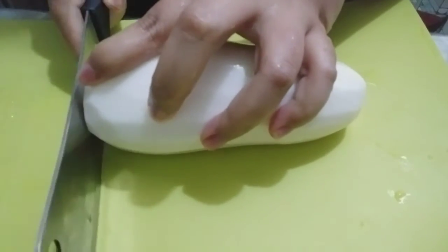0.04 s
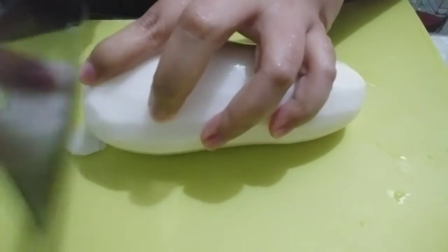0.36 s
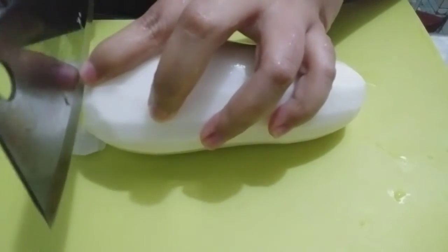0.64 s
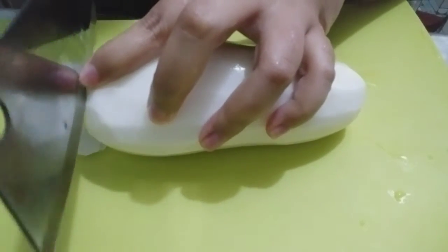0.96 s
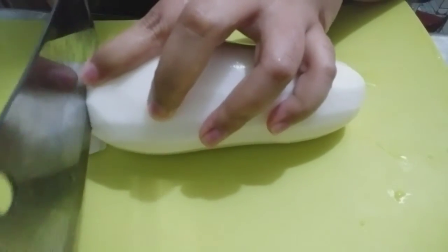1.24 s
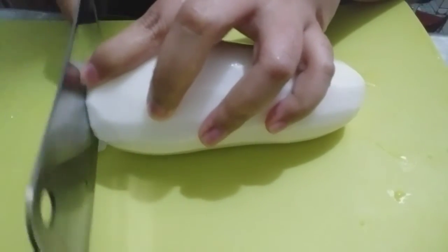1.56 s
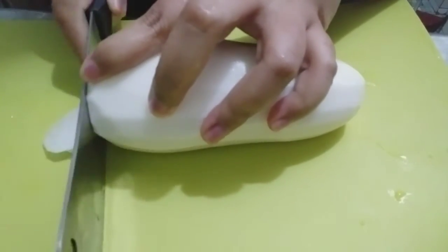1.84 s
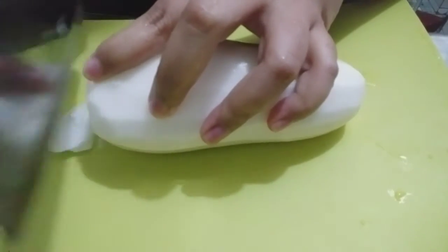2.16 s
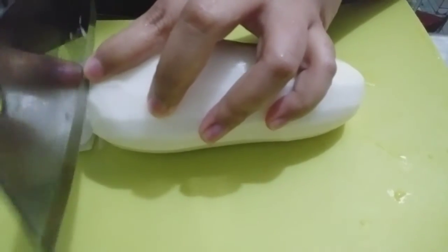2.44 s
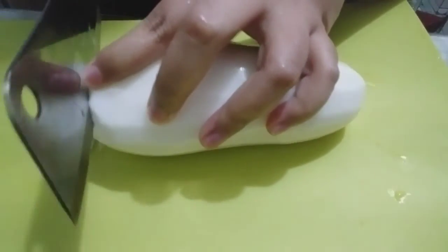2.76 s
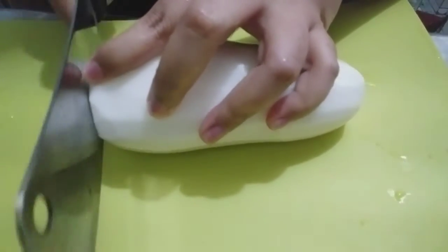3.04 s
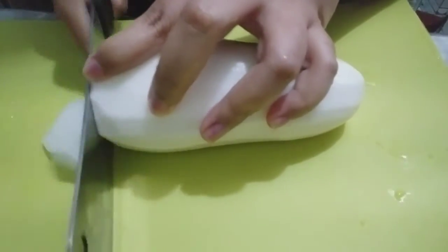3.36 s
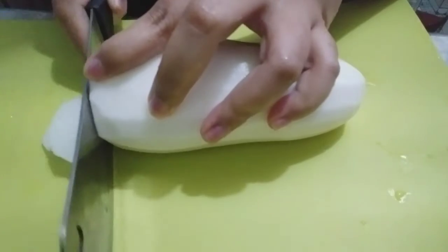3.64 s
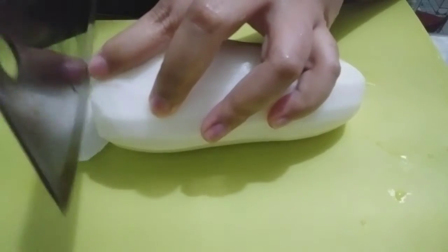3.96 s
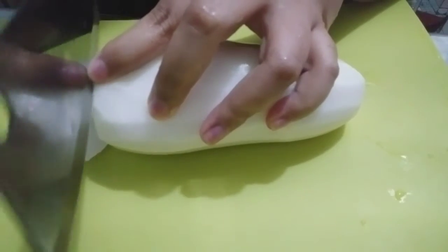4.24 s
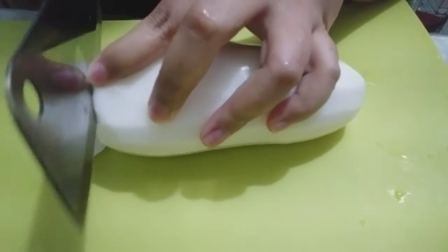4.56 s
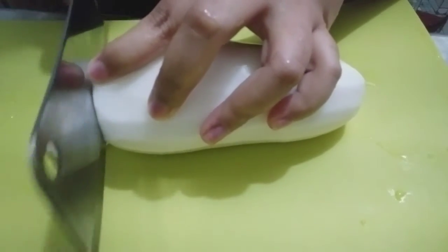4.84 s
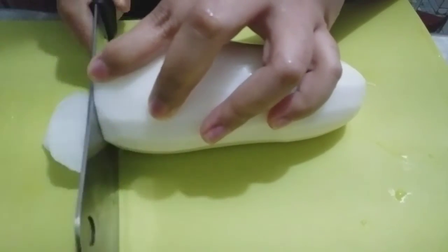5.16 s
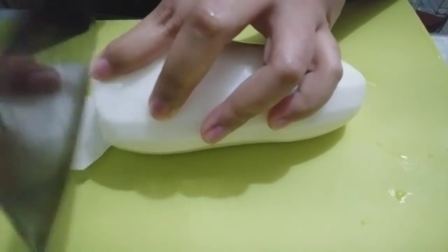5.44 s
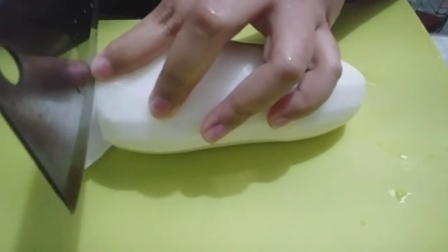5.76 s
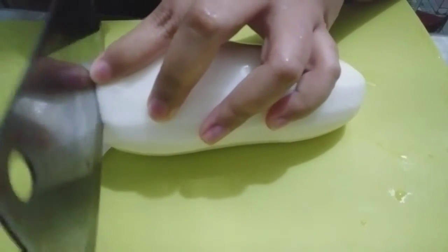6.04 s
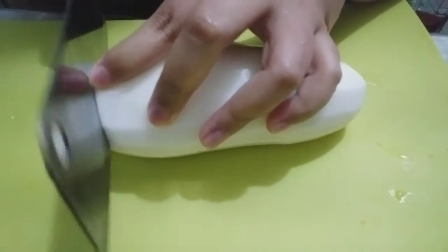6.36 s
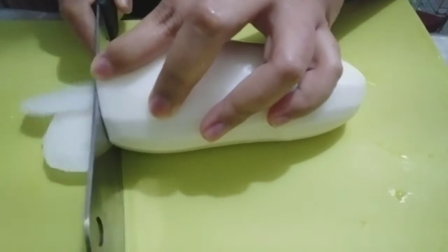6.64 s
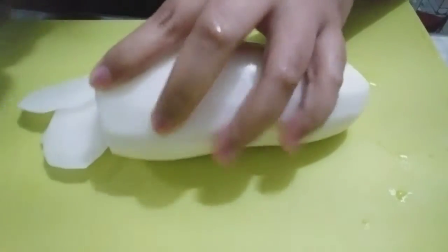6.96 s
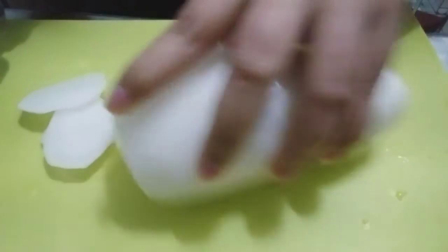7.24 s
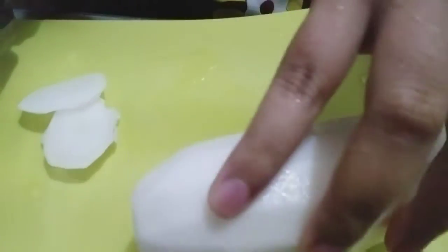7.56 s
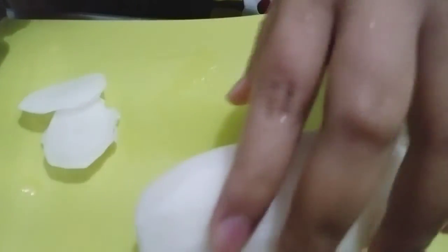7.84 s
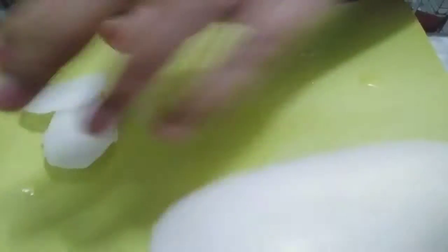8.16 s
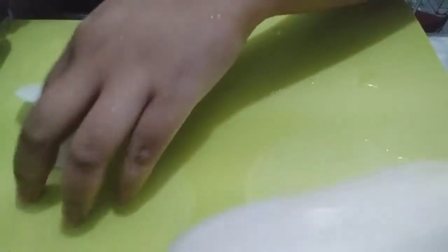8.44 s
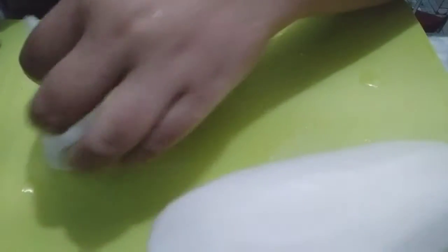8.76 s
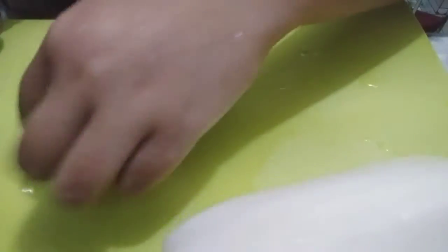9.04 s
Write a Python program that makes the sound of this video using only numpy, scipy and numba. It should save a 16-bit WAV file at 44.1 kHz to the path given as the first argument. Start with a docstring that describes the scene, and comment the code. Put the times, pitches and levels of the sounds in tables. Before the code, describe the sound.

A cleaver slices a peeled radish on a plastic cutting board, heard close up. Five loud bangs land at about 0.2, 2.0, 3.7, 5.4 and 6.8 seconds, each a sharp crack with a hollow thump of the board and a brief ring of steel. Before each one, the blade rasps softly through the wet flesh in short pushes and lighter draws, making the board hum, then breaks through with a quick swelling crunch. Between cuts the loose blade gives very faint high tings, near 0.9, 2.8, 4.3 and 6 seconds. Around 7.6 seconds the radish is set aside with a few light knocks and a short rub. Another faint ting comes at 8.3, while a hand gathers the slices with soft damp rubbing and small taps near 8.7 seconds. The small kitchen adds a short reverb over quiet, low room tone.

```python
"""A cleaver bangs on a plastic board five times, taking thin slices off a peeled radish in a small kitchen.
The blade rasps through the wet flesh in short pushes and breaks through with a crunch; each landing
rings the board and the steel. Then the radish is set aside and a hand gathers the slices with rubs and
light knocks. The loose blade sings faintly now and then. Hard walls add a short reverb over quiet room
tone, and a close phone limits every bang."""
import sys
import numpy as np
from scipy import signal
from scipy.fft import rfft, irfft, next_fast_len
from scipy.io import wavfile
from scipy.ndimage import uniform_filter1d, minimum_filter1d
from numba import njit

SR = 44100
rng = np.random.default_rng(int(sys.argv[2]) if len(sys.argv) > 2 else 0)


def to_wav(sig):
    """Store sig (one row per channel, or 1-D mono) as 16-bit WAV at the path in sys.argv[1].

    Samples outside -1..1 are clipped; the rate is SR.
    """
    pcm = np.clip(np.atleast_2d(sig), -1, 1) * 32767
    pcm = np.round(pcm).astype(np.int16)
    wavfile.write(sys.argv[1], SR, pcm.T)  # frames by channels


N = 405279
TIME = np.arange(N) / SR

# modes of the blade, damped by the grip and the radish: pitch_hz, level_db, t60_s
BLADE_MODES = [(2160, -10, .14), (2590, -6, .15), (2800, -9, .13), (3350, -5, .17), (3553, 0, .145),
               (3650, -8, .13), (4720, -10, .14), (5190, -11, .12), (6130, -14, .12), (7650, -11, .13),
               (7950, -12, .13)]
# tone colours: freq_hz, level_db
CLICK_SPECTRUM = [(200, -10.5), (780, -9.5), (1000, 2), (1300, -2), (1900, 0.5), (3000, 3.5), (5000, 3.5),
                  (8000, -5.5), (8900, -16.5), (13000, -12)]  # hard contact
RASP_SPECTRUM = [(300, -6.5), (650, -10), (1000, -1.5), (1650, -7), (2100, -3), (2700, -3), (3600, -2),
                 (5000, -2), (6300, -4.5), (7700, 1), (8900, -9), (13000, -8.5)]  # wet flesh
RUB_SPECTRUM = [(300, -3.5), (800, -7.5), (980, 2), (1200, -3), (1600, -0.5), (1900, -9), (2200, -6.5),
                (2800, -13.5), (3050, -8.5), (3350, -15), (3900, -2), (4500, -16), (6000, -15),
                (7600, -10.5), (9000, -35.5), (13000, -43.5)]  # dull friction
RUMBLE_SPECTRUM = [(30, -17.5), (60, -13.5), (100, 4), (170, -2), (220, -5.5), (320, -15.5), (600, -20),
                   (1200, -31.5), (3000, -58.5)]  # low body of the board


def chops(clatter_db=5, crack_db=7, crack_t60=0.0076, blade_db=-11):
    """The edge cracks on the board; board and blade ring in clear modes over a dense clatter."""
    # the blade lands: start_s, force_db, tilt_db_per_octave, board_db, clatter_t60_s, worktop_db
    landings = [(0.201, 0, -1.1, -3.5, 0.2, -23.5), (2.0126, -0.5, -1, -2.5, 0.22, -32.5),
                (3.7230, -2.5, -1.14, -3, 0.2, -38), (5.4435, -1.5, -1, -3, 0.21, -29.5),
                (6.8010, -1.5, -0.37, -5, .19, -9.5)]
    # colour of the clatter: freq_hz, level_db
    clatter_spectrum = [(35, -35.5), (85, -7.5), (125, -11.5), (220, -5.5), (320, -5.5), (560, 2),
                        (820, -5), (1100, -2.5), (1900, -9), (3600, -11), (5800, -18.5), (8100, -17),
                        (8900, -26.5), (13000, -28.5)]
    # struck modes: pitch_hz, level_db, t60_s
    thump_mode = [(215, 5.5, .21)]  # the whole board in its main mode
    board_modes = [(95, -21, 0.68), (160.8, -10, 0.29), (420.6, -14.5, 0.31), (513.4, -7, .17),
                   (578, -7.5, 0.21), (625, -4.5, 0.23), (693.6, -6.5, 0.23), (938, -8.5, 0.27),
                   (967, -10, 0.27), (1036, -10.5, 0.25), (1118, -12.5, .18), (1220, -12, 0.29),
                   (1303, -11.5, 0.18), (1532, -10.5, 0.12)]  # its other modes
    worktop_mode = [(56, 0, 0.12)]  # the worktop gives under a heavy blow
    out, t = np.zeros(N), TIME[:SR]
    for start, force_db, tilt_db, board_db, clatter_t60, worktop_db in landings:
        clatter = noise(SR, clatter_spectrum, tilt_db) * fade(t, clatter_t60)
        crack = noise(SR, CLICK_SPECTRUM) * fade(t, crack_t60)
        board = ring(thump_mode) + amp(board_db) * ring(board_modes)
        steel = amp(blade_db) * ring(BLADE_MODES)
        thud = amp(worktop_db) * ring(worktop_mode)
        bang = amp(clatter_db) * clatter + amp(crack_db) * crack + board + steel + thud
        add(out, start, amp(force_db) * bang)
    return out


def sawing(rasp_t60=0.13, hum_t60=0.52, hum_lag_s=0.008, hum_build_db=3):
    """Envelopes of rasp and board hum as the blade saws to and fro; the hum builds later and lingers."""
    # the blade is pushed into the flesh: full_pressure_s, hold_s, rise_s, rasp_db, hum_db
    pushes = [(0.104, 0.077, .06, -46, -44.5), (1.385, 0.12, 0.089, -53.5, -49.5),
              (1.878, 0.039, 0.053, -35, -34), (1.984, 0.014, .03, -39.5, -44),
              (2.871, 0.044, 0.068, -61.5, -66), (3.278, 0.037, 0.053, -41.5, -44.5),
              (3.668, 0.017, 0.068, -47, -50.5), (4.618, 0.029, 0.09, -60.5, -61),
              (4.991, 0.088, .055, -45.5, -44.5), (5.397, 0.016, 0.083, -43, -47.5),
              (6.292, .11, 0.03, -53.5, -55), (6.738, .015, 0.042, -41.5, -38)]
    # it is drawn lightly back through the cut: full_pressure_s, hold_s, rasp_db, hum_db
    draws = [(.005, 0.041, -69, -51.5), (1.62, 0.14, -63.5, -52), (3.021, 0.088, -69.5, -64.5),
             (3.438, 0.097, -62, -54), (4.737, 0.11, -72, -67.5), (5.173, 0.1, -58, -52),
             (6.504, 0.11, -63.5, -59.5)]
    push_lean_db, draw_lean_db, draw_rise_s = 1, -2.5, 0.045  # a push bears down, a draw eases off
    moves = [(at, hold, rise, push_lean_db, *levels) for at, hold, rise, *levels in pushes]
    moves += [(at, hold, draw_rise_s, draw_lean_db, *levels) for at, hold, *levels in draws]
    rasp, hum = np.zeros(N), np.zeros(N)
    for at, hold, rise, lean_db, rasp_db, hum_db in moves:
        rasp += amp(rasp_db) * stroke(at, hold, rise, lean_db, rasp_t60)
        hum += amp(hum_db) * stroke(at + hum_lag_s, hold, rise, lean_db + hum_build_db, hum_t60)
    return rasp, hum


def slicing(hum_db=1, steel_db=-9, drag_db=-58, hard_push_db=-36, grip_t60=0.069):
    """Wet cells burst along the edge and ring the gripped blade; its drag makes the board hum."""
    # colour of the humming board: freq_hz, level_db
    hum_spectrum = [(30, -27.5), (60, -10), (100, 0.5), (185, -5.5), (218, 8.5), (255, -11.5), (320, -19.5),
                    (420, -18), (1000, -28.5), (3000, -57.5)]
    rasp, hum = sawing()
    pressure = np.sqrt(rasp / amp(hard_push_db))
    bursts = grains(per_second=39000, spread_db=-0.5)
    catching = waver(depth_db=2, samples=300)  # the edge catches and slips on the fibres
    cells = colour(bursts * catching, RASP_SPECTRUM)
    # only a hard push wakes the steel; in a light one the dull rub of the blade's side stands out
    gripped_blade = ring(BLADE_MODES) * fade(TIME[:SR], grip_t60)
    steel = pressure * unit(signal.fftconvolve(cells, gripped_blade)[:N])
    drag = pressure * noise(N, RUB_SPECTRUM)
    board_hum = hum * noise(N, hum_spectrum)
    return rasp * (cells + amp(steel_db) * steel) + amp(drag_db) * drag + amp(hum_db) * board_hum


def breakthroughs(lean_db=2, release_t60=0.023):
    """The blade speeds up as the slice gives way: a swelling crunch."""
    # the last of the slice breaks just before the chop: full_crunch_s, hold_s, rise_s, level_db
    breaks = [(0.18, 0.0011, 0.0092, -24), (1.993, .009, 0.016, -20), (3.696, .016, 0.023, -18.5),
              (5.416, .02, .04, -20.5), (6.783, .011, 0.046, -20.5)]
    # colour of the crunch: freq_hz, level_db
    crunch_spectrum = [(100, 0), (220, 4.5), (400, -11), (800, -16.5), (1300, -12.5), (2200, -14.5),
                       (4200, -0.5), (6000, -3.5), (8000, -2), (9000, -13), (13000, -11)]
    swell = sum(amp(db) * stroke(at, hold, rise, lean_db, release_t60) for at, hold, rise, db in breaks)
    return swell * colour(grains(per_second=10000, spread_db=-1), crunch_spectrum)


def knocks(rattle_db=-19, rattle_t60=0.23, thud_t60=0.081, thud_swell_t60=0.02):
    """Each light knock is a small wet click with a short rattle, and a soft thud of the board."""
    # blade, radish and fingers touch down: start_s, click_db, click_t60_s, thud_db
    touches = [(0.177, -35, 0.012, -38), (0.192, -30.5, 0.027, -25.5), (1.969, -38, 0.023, -50),
               (3.677, -30.5, 0.02, -48.5), (4.978, -44, 0.011, -50.5), (6.017, -63.5, 0.053, -73.5),
               (6.483, -58, 0.021, -66.5), (6.719, -43, 0.01, -59), (7.638, -54, .05, -48),
               (7.653, -39.5, 0.18, -49.5), (7.708, -43.5, 0.048, -52), (7.883, -55, 0.011, -71.5),
               (8.631, -52, 0.024, -38.5), (8.665, -34.5, 0.0124, -42), (8.687, -49, 0.033, -41),
               (8.774, -52, 0.024, -47)]
    out, t = np.zeros(N), TIME[:SR // 2]
    for start, click_db, click_t60, thud_db in touches:
        click_decay = fade(t, click_t60) + amp(rattle_db) * fade(t, rattle_t60)
        click = noise(len(t), CLICK_SPECTRUM) * click_decay
        thud = noise(len(t), RUMBLE_SPECTRUM) * (fade(t, thud_t60) - fade(t, thud_swell_t60))
        add(out, start, amp(click_db) * click + amp(thud_db) * thud)
    return out


def sliding(lean_db=-2, rub_t60=0.33, rumble_t60=0.73):
    """Envelopes of rub and rumble over all slides; the board rumbles on after the rub."""
    # radish, then hand and slices, slide: full_pressure_s, hold_s, rise_s, rub_db, rumble_db
    slides = [(7.564, 0.052, .06, -72, -77.5), (7.649, 0.051, 0.02, -48.5, -42.5),
              (8.091, 0.23, 0.19, -70.5, -56.5), (8.387, 0.24, .1, -67, -61.5),
              (8.651, 0.053, 0.092, -59, -47.5), (8.8, 0.43, .06, -65.5, -55.5)]
    rub, rumble = np.zeros(N), np.zeros(N)
    for at, hold, rise, rub_db, rumble_db in slides:
        rub += amp(rub_db) * stroke(at, hold, rise, lean_db, rub_t60)
        rumble += amp(rumble_db) * stroke(at, hold, rise, lean_db, rumble_t60)
    return rub, rumble


def handling(friction_db=-1, wet_db=-10, rumble_db=-1):
    """Skin and radish rub over the board; wet patches crackle in flurries of tiny clicks."""
    rub, rumble = sliding()
    friction = colour(grains(per_second=11000, spread_db=-4), RUB_SPECTRUM)
    flurries = grains(per_second=3500, spread_db=0.5) * waver(depth_db=4, samples=2500)
    wet = colour(flurries, RASP_SPECTRUM)
    board_rumble = rumble * noise(N, RUMBLE_SPECTRUM)
    return rub * (amp(friction_db) * friction + amp(wet_db) * wet) + amp(rumble_db) * board_rumble


def tings(swell_t60=0.065, shimmer_db=-84):
    """Stuttering tones of the blade as it is lifted or wiped: one main mode over a faint shimmer."""
    # the loose steel sings: start_s, pitch_hz, level_db, t60_s
    tones = [(.86, 4660, -78.5, 0.26), (2.78, 4670, -72, 0.31), (4.29, 4660, -70, 0.39),
             (6.01, 5450, -79.5, 0.35), (6.16, 5500, -83, 0.89), (8.32, 6440, -63.5, 1.16)]
    # upper modes of the steel: pitch_hz, level_db, t60_s
    shimmer_modes = [(5450, -2, .3), (7000, -2, .3), (7700, 1, .3), (8350, -1, 0.32), (10300, -3, 0.35),
                     (11700, -4, .3), (12550, -10, .3)]
    out, t = np.zeros(N), TIME[:SR]
    for start, hz, db, t60 in tones:
        tone = np.sin(2 * np.pi * hz * t) * (fade(t, t60) - fade(t, swell_t60))
        add(out, start, amp(db) * tone + amp(shimmer_db) * ring(shimmer_modes))
    return out * waver(depth_db=5, samples=600)


def kitchen_reverb(x, build_s=0.035):
    """Diffuse reflections from hard walls; the bass lingers longest."""
    # what the walls send back: freq_hz, level_db
    wall_spectrum = [(50, -9), (100, -3.5), (150, 0), (215, -6), (320, -2), (420, -0.5), (600, -4),
                     (1200, -0.5), (3000, -4), (13000, 1.5)]
    # decay of the room: freq_hz, t60_s
    decay_times = [(80, 1), (220, 0.87), (320, 0.87), (420, .78), (580, .58), (1200, 0.47), (3000, 0.44),
                   (8000, 0.35), (13000, 0.32)]
    t, hz = TIME[:SR], np.arange(SR // 2 + 1)
    reflections = amp(on_log_axis(hz, wall_spectrum)) * np.exp(2j * np.pi * rng.random(len(hz)))
    edges_hz = np.geomspace(55, SR / 2, 28)
    tail = np.zeros(SR)
    for low, high in zip(edges_hz, edges_hz[1:]):
        band = irfft(reflections * (hz >= low) * (hz < high), SR)
        tail += band * fade(t, on_log_axis((low + high) / 2, decay_times))
    tail *= np.minimum(t / build_s, 1)
    return signal.fftconvolve(x, tail / np.sqrt(np.sum(tail ** 2)))[:N]


def room_tone(level_db=-66.5):
    """The quiet kitchen: a steady low murmur with a trace of hiss."""
    # colour of the background: freq_hz, level_db
    quiet_spectrum = [(30, -28), (60, -10), (95, 1.5), (170, -7.5), (218, 2), (320, -18.5), (420, -8.5),
                      (600, -21.5), (850, -25.5), (1010, -16), (1300, -25.5), (3000, -36), (7800, -38),
                      (9000, -47), (13000, -46.5)]
    return amp(level_db) * noise(N, quiet_spectrum)


def stereo_side(x, level_db=-7, above_hz=4500):
    """The treble reaches the two microphones with a wandering phase difference; the bass is centred."""
    phase = uniform_filter1d(np.cumsum(0.1 * rng.standard_normal(N)), size=60)
    shifted = np.real(signal.hilbert(x, next_fast_len(N))[:N] * np.exp(1j * phase))
    treble = signal.butter(18, above_hz, "high", fs=SR, output="sos")
    return amp(level_db) * signal.sosfilt(treble, shifted)


def stroke(at, hold, rise, lean_db, release_t60, rise_db=25):
    """Envelope of one movement: it takes hold up to `at`, leans in or eases off, and lets go."""
    t = TIME - at
    taking_hold = rise_db * np.minimum(t / rise, 0)
    leaning = lean_db * (np.clip(t / hold, 0, 1) - 0.5)
    return amp(taking_hold + leaning) * fade(np.maximum(t - hold, 0), release_t60)


def ring(modes, scatter_db=0.3):
    """Struck modes; each blow lands on another spot, which shifts their weights."""
    out, t = np.zeros(SR), TIME[:SR]
    for hz, db, t60 in modes:
        weight = amp(db + scatter_db * rng.standard_normal()) * rng.choice([-1, 1])
        out += weight * fade(t, t60) * np.sin(2 * np.pi * hz * t)
    return out


def grains(per_second, spread_db):
    """Tiny clicks of random size at random moments; spread_db lifts or sinks a few of them."""
    present = rng.random(N) < per_second / SR
    return present * rng.standard_normal(N) * amp(spread_db * np.minimum(rng.exponential(size=N), 4))


def waver(depth_db, samples):
    """A gain that wanders at random, changing over about this many samples."""
    return amp(depth_db * unit(uniform_filter1d(rng.standard_normal(N), size=samples)))


def noise(samples, spectrum, tilt_db=0):
    """Coloured noise at rms 1."""
    return colour(rng.standard_normal(samples), spectrum, tilt_db)


def colour(x, spectrum, tilt_db=0):
    """Give x a spectrum, tilted by tilt_db per octave around 1 kHz; rms 1."""
    size = next_fast_len(len(x))
    hz = np.arange(size // 2 + 1) * SR / size
    octaves = np.log2(np.maximum(hz, 200) / 1000)
    dc_cut = hz ** 2 / (hz ** 2 + 25 ** 2)
    gain = dc_cut * amp(on_log_axis(hz, spectrum) + tilt_db * octaves)
    return unit(irfft(rfft(x, size) * gain, size)[:len(x)])


def on_log_axis(hz, points):
    """Read (freq_hz, value) points on a log-frequency axis."""
    freq_hz, value = np.transpose(points)
    return np.interp(np.log(hz + 1), np.log(freq_hz), value)


def fade(t, t60):
    """Exponential decay, 60 dB down after t60 seconds."""
    return np.exp(-np.log(1000) * t / t60)


def amp(db):
    """Decibels to gain."""
    return 10 ** (np.asarray(db) / 20)


def unit(x):
    """Scale to rms 1."""
    return x / np.sqrt(np.mean(x ** 2))


def add(track, start_s, sound):
    """Mix a sound into the track."""
    i = int(start_s * SR)
    track[i:i + len(sound)] += sound[:N - i]


def scene(reverb_db=-18):
    """Everything on the board, heard in the quiet kitchen."""
    direct = chops() + slicing() + breakthroughs() + knocks() + handling() + tings()
    diffuse = amp(reverb_db) * kitchen_reverb(direct) + room_tone()
    mid = direct + diffuse
    side = stereo_side(direct + np.sqrt(2) * diffuse)  # the room is wider than the board
    return np.array([mid + side, mid - side])


@njit
def follow_peaks(x, release):
    """The limiter's detector: jumps up at once, then sinks."""
    out, peak = np.empty(len(x)), 0.
    for i in range(len(x)):
        peak = max(x[i], peak * release)
        out[i] = peak
    return out


def record(dry, ceiling=0.91, release_s=0.009, clip_at=0.88, low_cut_hz=42, top_hz=13050):
    """A look-ahead limiter flattens each bang; remaining peaks clip; deep bass and top are cut."""
    peak = follow_peaks(np.abs(dry).max(axis=0), np.exp(-1 / (release_s * SR)))
    gain = ceiling / np.maximum(peak, ceiling)
    gain = uniform_filter1d(minimum_filter1d(gain, size=261), size=101)  # ducks just before the bang
    limited = np.clip(dry * gain, -clip_at, clip_at)
    low_cut = signal.butter(2, low_cut_hz, "high", fs=SR, output="sos")
    high_cut = signal.ellip(10, 0.2, 70, top_hz, fs=SR, output="sos")
    return signal.sosfilt(high_cut, signal.sosfilt(low_cut, limited))


dry = scene()
out = record(dry)
to_wav(out)
```